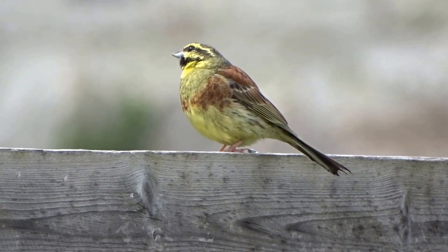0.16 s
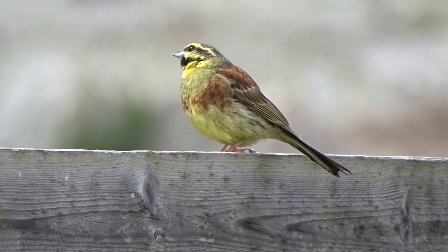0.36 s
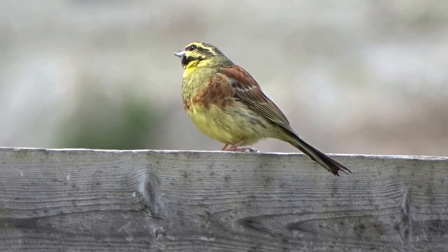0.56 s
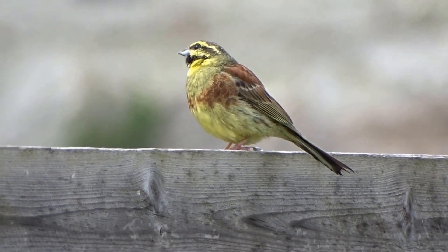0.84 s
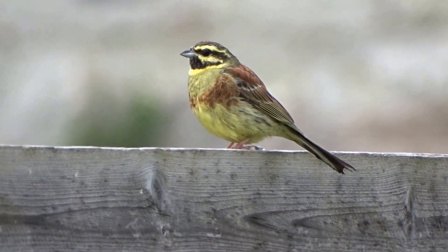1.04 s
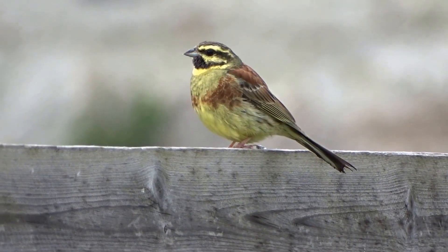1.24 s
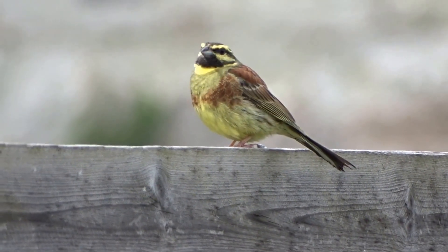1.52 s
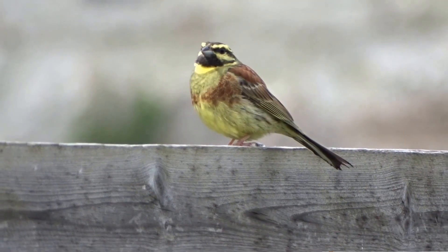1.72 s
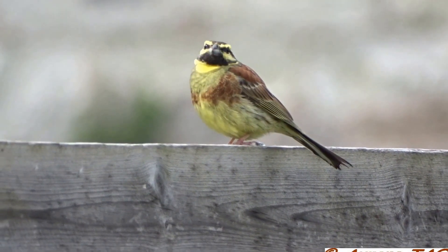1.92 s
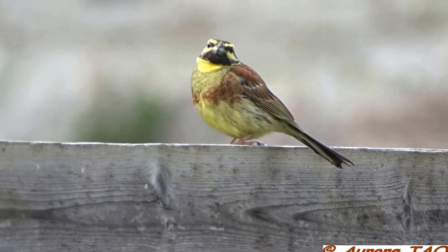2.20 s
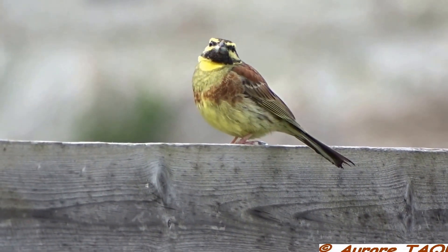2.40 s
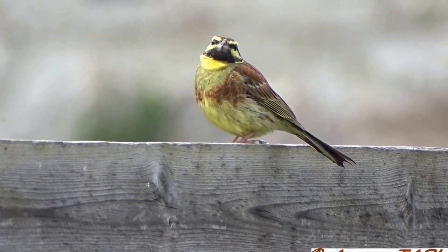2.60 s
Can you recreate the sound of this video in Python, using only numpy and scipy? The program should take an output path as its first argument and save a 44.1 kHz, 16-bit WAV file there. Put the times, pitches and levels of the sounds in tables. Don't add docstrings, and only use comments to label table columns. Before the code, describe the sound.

A small bird close by gives two tiny, piercing, falling calls about a second apart, with faint outdoor echoes; distant traffic rumbles and hisses throughout, while far birds chip quietly and another answers from the left.

```python
import sys
import numpy as np
from scipy import signal
from scipy.io import wavfile
from scipy.ndimage import uniform_filter1d

SR = 44100
rng = np.random.default_rng(int(sys.argv[2]) if len(sys.argv) > 2 else 0)


def pcm_store(signal):
    levels = np.round(np.clip(np.atleast_2d(signal), -1, 1) * 32767)
    wavfile.write(sys.argv[1], SR, levels.astype(np.int16).T)


def boost(x):
    u = np.asarray(x, float) / 20
    return 10 ** u


N = 121275

# time in seconds, level in dB.
PASSING = [(0.0, -45), (0.03, -46), (1.2, -45.5), (1.57, -44), (1.73, -44.5), (1.78, -43.5), (2.53, -44.5),
           (2.75, -46.5)]


def evened(x):
    return x / np.sqrt(np.mean(x ** 2) + 1e-20)


def read(points, hz):
    f, value = np.transpose(points)
    return np.interp(np.log(hz + 1), np.log(f + 1), value)


def wash(colour, swell, share, patchy_db, size):
    # frequency in Hz, left-right correlation from 0 to 1.
    likeness = [(60, 0.99), (130, 1), (270, 0.97), (560, 0.7), (1190, 0.84), (2510, 0.53), (5300, 0.57),
                (11200, 0.63)]
    # frequency in Hz, left minus right in dB.
    balance = [(60, 0.5), (170, -0.5), (490, 1.0), (1380, 2.5), (3930, 1.0), (11200, -1.5)]
    frames, hz = 4 * N // size + 5, np.fft.rfftfreq(size, 1 / SR)
    a, b, c, d, patches = rng.standard_normal((frames, len(hz), 5)).T
    patches = uniform_filter1d(patches, size=10, axis=0)
    patches = evened(uniform_filter1d(patches, size=16384 // size, axis=1))
    same = np.clip(read(likeness, hz), 0, 1)[:, None]
    lean = boost(read(balance, hz) / 2)[:, None]
    left = a + 1j * b
    right = same * left + np.sqrt(1 - same ** 2) * (c + 1j * d)
    spectra = np.array([left * lean, right / lean])
    octaves_out = abs(np.log2((hz + 1) / np.clip(hz + 1, colour[0][0], colour[-1][0])))
    spectra *= boost((read(colour, hz) - 20 * octaves_out)[:, None] + patchy_db * patches)
    s, db = np.transpose(swell)
    near = boost(share * np.interp(np.arange(N) / SR, s, db - db.mean()))
    noise = signal.istft(spectra, nperseg=size, noverlap=3 * size // 4)[1][:, :N]
    return near * evened(noise)


def road():
    # frequency in Hz, level in dB per Hz.
    roar_colour = [(250, -11), (400, -2.5), (560, -2.5), (750, -0.5), (1150, -0.5), (1500, -3.5),
                   (2000, -11), (2700, -19.5)]
    # frequency in Hz, level in dB per Hz.
    rumble_colour = [(36, -20), (43, -2.5), (58, -4), (80, -8.5), (125, -5), (175, -1), (290, -2),
                     (420, -12.5)]
    # time in seconds, level in dB.
    lorries = [(0.0, -43.5), (0.09, -48.5), (1.22, -46.5), (1.28, -50), (1.37, -45.5), (1.85, -45),
               (1.88, -55), (1.92, -48), (2.3, -45), (2.75, -50)]
    roar_db, rumble_db = np.mean(PASSING, axis=0)[1] + 0.91, -47
    roar = boost(roar_db) * wash(roar_colour, PASSING, share=0.98, patchy_db=1.04, size=1024)
    rumble = boost(rumble_db) * wash(rumble_colour, lorries, share=1.12, patchy_db=1.03, size=4096)
    return roar + rumble


def air():
    # frequency in Hz, level in dB per Hz.
    hiss_colour = [(2000, -20.5), (2800, -23.5), (3600, -24.5), (5000, -31.5), (6400, -34), (7200, -29.5),
                   (9500, -31), (11500, -36)]
    # middle in seconds, width in seconds, treble lift in dB.
    rustles = [
        (1.75, .05, 2),
        (2.1, 0.036, 3),
        (2.2, 0.11, 1.5),
        (2.45, .06, 3),
        (2.65, .04, 5.5),
    ]
    t = np.arange(N) / SR
    hiss = boost(-59) * wash(hiss_colour, PASSING, share=.55, patchy_db=1.6, size=1024)
    treble = signal.sosfilt(signal.butter(2, 5500, "high", fs=SR, output="sos"), hiss)
    lift_db = sum(db * np.exp(-((t - s) / width) ** 2) for s, width, db in rustles)
    return hiss + treble * (boost(lift_db) - 1)


def engines():
    # frequency in Hz, level in dB, bandwidth in Hz.
    drones = [
        (107, -59, 3.3),
        (168.7, -59.5, 9.8),
        (231.8, -62.5, 15.5),
        (295.6, -62.5, 9.8),
        (602, -68.5, 5.5),
    ]
    t, out = np.arange(N) / SR, np.zeros(N)
    for hz, db, width in drones:
        r = np.exp(-np.pi * width / SR)
        noise = rng.standard_normal(N + SR) + 1j * rng.standard_normal(N + SR)
        wobble = signal.lfilter([1], [1, -2 * r, r * r], noise)[SR:]
        out += boost(db) * evened((wobble * np.exp(2j * np.pi * hz * t)).real)
    return out


def glide(points, start, lift_hz=0):
    s, hz, db = np.transpose(points)
    t = np.arange(N) / SR - start
    pitch = uniform_filter1d(np.interp(t, s, hz) + lift_hz, size=160)
    level = uniform_filter1d(np.interp(t, s, db, -120, -120), size=60)
    return 2 * np.pi * np.cumsum(pitch) / SR, boost(level)


def bunting():
    # start in seconds, strength in dB, onset click in dB.
    calls = [
        (.1, 0, -47),
        (1.2688, 0, -65),
    ]
    # time from the start in seconds, pitch in Hz, effort in dB.
    lower = [(.002, 8000, -35), (.006, 7770, -29), (.01, 7625, -24.5), (.018, 7330, -25.5),
             (.024, 7250, -27), (.03, 7200, -29.5), (.042, 7208, -28.5), (.049, 7320, -42),
             (.056, 7200, -42)]
    # time from the start in seconds, pitch in Hz, effort in dB.
    uppers = [
        [(-.023, 9400, -70), (-.011, 8550, -52), (-.002, 8270, -44), (.0, 8110, -28.5), (.007, 8000, -28),
         (.014, 7700, -31), (.024, 7555, -23), (.041, 7500, -30.5), (.049, 7250, -43)],
        [(-.023, 9300, -70), (-.013, 8620, -68), (-.008, 8350, -50), (.001, 8225, -24), (.008, 7980, -28),
         (.015, 7745, -29), (.024, 7640, -23), (.04, 7570, -28), (.048, 7500, -46)],
    ]
    coupling_db, coupling_fade_s = -7, .016
    rasp_db, rasp_hz = -22, 380
    t = np.arange(N) / SR
    out = np.zeros(N)
    r = np.exp(-2 * np.pi * rasp_hz / SR)
    breath = signal.lfilter([1], [1, -2 * r, r * r], rng.standard_normal(N))
    flutter = 1 + boost(rasp_db) * evened(breath)
    click_band = signal.butter(4, [4500, 6600], "band", fs=SR, output="sos")
    click = signal.sosfilt(click_band, rng.standard_normal(N))
    for (start, db, click_db), upper in zip(calls, uppers):
        up_phase, up = glide(upper, start)
        low_phase, low = glide(lower, start)
        fade = np.exp(-np.maximum(t - start, 0) / coupling_fade_s)
        both = np.sqrt(up * low) * boost(coupling_db) * fade
        voices = up * np.sin(up_phase) + low * np.sin(low_phase)
        combination = both * np.sin(2 * up_phase - low_phase)
        out += boost(db) * flutter * (voices + combination)
        out += boost(click_db) * click * np.exp(-((t - start - .002) / 0.0026) ** 2)
    return out


def scatter(x, t60, same):
    taps = np.zeros((2, SR))
    at = np.arange(60, SR - 20, 20) + rng.integers(0, 20, (2, (SR - 61) // 20))
    np.put_along_axis(taps, at, rng.choice([-1., 1.], at.shape), 1)
    same = np.clip(same, 0, 1)
    shared = taps[0] * np.sqrt(same)
    own = [[1], [-1]] * taps[1] * np.sqrt(1 - same)
    taps = (shared + own) * boost(-60 * np.arange(SR) / SR / t60)
    return signal.fftconvolve(x[None], taps / np.linalg.norm(taps[0]), axes=1)[:, :N]


def yard(x):
    # delay in seconds, level in dB, smear in seconds.
    hedges = [
        (.025, -26, 0.013),
        (.075, -28, 0.021),
        (.17, -36.5, .02),
        (.27, -37, 0.019),
        (.38, -41, .04),
    ]
    # level in dB, decay time t60 in seconds, left-right likeness from 0 to 1.
    tails = [
        (-19.5, 0.22, 0.66),
        (-25.5, 1.56, 0.98),
    ]
    port_lag_s = 1.5e-6
    wall_s, wall_db, wall_hz, wall_width_hz = .2625, -26.5, 7590, 590
    t = np.arange(SR // 2) / SR
    out = np.array([x, x + port_lag_s * SR * np.gradient(-x)])
    taps = np.zeros((2, len(t)))
    for s, db, smear in hedges:
        shared, own = rng.standard_normal((2, len(t))) * np.exp(-((t - s) / smear) ** 2)
        taps += boost(db) * (shared + [[.3], [-.3]] * own) / np.linalg.norm(shared)
    out += signal.fftconvolve(x[None], taps, axes=1)[:, :N]
    wall = signal.lfilter(*signal.iirpeak(wall_hz, wall_hz / wall_width_hz, SR), x)
    out += boost(wall_db) * np.r_[np.zeros(round(wall_s * SR)), wall][:N]
    return out + sum(boost(db) * scatter(x, t60, same) for db, t60, same in tails)


def far_birds():
    # middle in seconds, length in seconds, first pitch in Hz, last pitch in Hz, level in dB.
    chips = [(0.371, .02, 4150, 3350, -52.5), (.386, .012, 3750, 3680, -58), (.405, .025, 3180, 3250, -59),
             (0.424, .02, 3310, 3790, -53), (0.443, 0.023, 3500, 3220, -62),
             (0.611, .016, 3525, 3510, -57.5), (2.007, 0.013, 5100, 3900, -56),
             (2.016, .014, 3830, 3790, -53), (2.035, 0.015, 3870, 3830, -54.5),
             (2.074, .01, 3800, 3780, -56), (2.094, .012, 4370, 4370, -61), (2.434, .02, 4350, 4590, -57),
             (2.445, 0.0119, 4500, 5200, -53), (2.45, .013, 5100, 3630, -49),
             (2.478, .012, 4100, 4150, -65), (2.479, .014, 3610, 3430, -56), (2.502, .016, 3310, 3400, -57),
             (2.65, .014, 8400, 8350, -60), (2.654, .02, 7520, 7540, -61), (2.686, .01, 7660, 7630, -64)]
    # time in seconds, pitch in Hz, effort in dB.
    reply = [(1.49, 9200, -72), (1.5, 8250, -59), (1.508, 7750, -52), (1.514, 7600, -48),
             (1.522, 7370, -50), (1.532, 7265, -52), (1.544, 7380, -52), (1.552, 7420, -53),
             (1.558, 7440, -68)]
    rasp_depth, rasp_grain_s = 0.63, .002
    far_db, wet_db, answer_pan_db = -0.5, -5, 7
    out = np.zeros(N)
    for middle, length, from_hz, to_hz, db in chips:
        u = np.linspace(0, 1, round(length * 1.56 * SR))
        at = round((middle - length * .75) * SR)
        phase = 2 * np.pi * np.cumsum(from_hz + (to_hz - from_hz) * u) / SR
        out[at:at + len(u)] += boost(db) * np.sin(np.pi * u) ** 2 * np.sin(phase)
    grain = uniform_filter1d(rng.standard_normal(N), size=round(rasp_grain_s * SR))
    out = out * (1 + rasp_depth * evened(grain))
    turn, height = glide(reply, 0)
    answer = height * np.sin(turn)
    pan = boost(np.array([[.5], [-.5]]) * answer_pan_db)
    wet = boost(wet_db) * scatter(out + .5 * answer, t60=0.22, same=.8)
    return boost(far_db) * out + answer * pan + wet


def scene():
    return yard(bunting()) + far_birds() + road() + air() + engines()


def low_pass(x):
    return signal.sosfilt(signal.butter(12, 11080, fs=SR, output="sos"), x)


def record(dry):
    taps = signal.firwin(1023, 11070, window=("kaiser", 9), fs=SR)[None]
    padded = np.pad(dry, ((0, 0), (511, 511)), "reflect")
    cut = signal.oaconvolve(padded, taps, "valid", axes=1)
    return low_pass(cut)


dry = scene()
out = record(dry)
pcm_store(out)
```